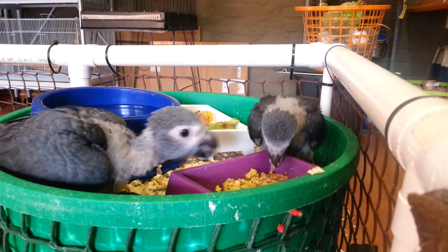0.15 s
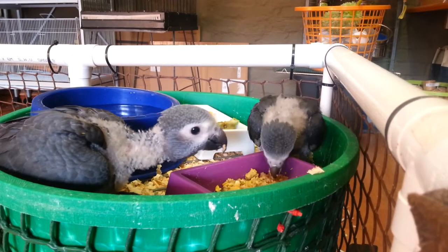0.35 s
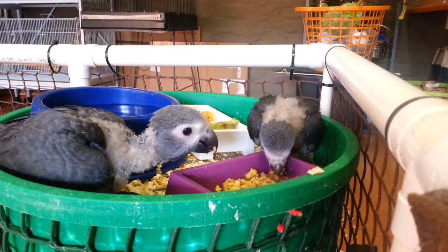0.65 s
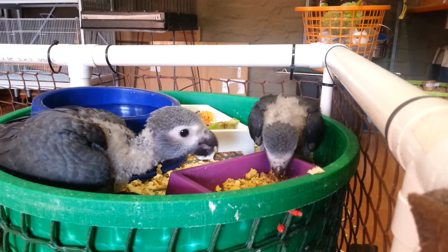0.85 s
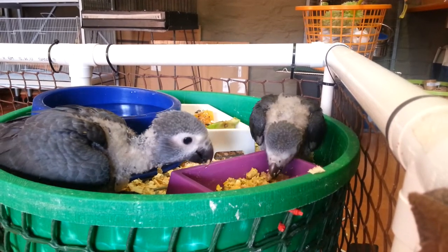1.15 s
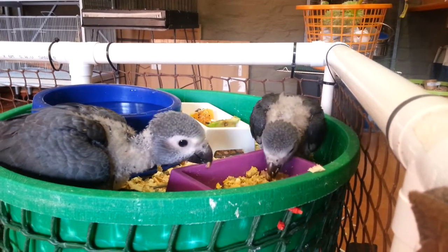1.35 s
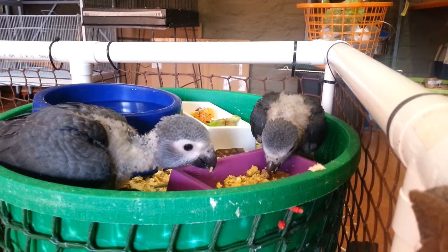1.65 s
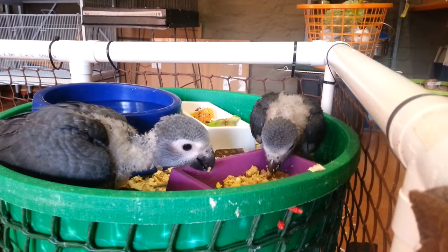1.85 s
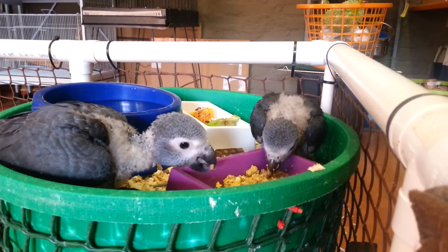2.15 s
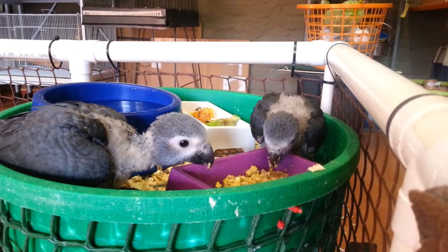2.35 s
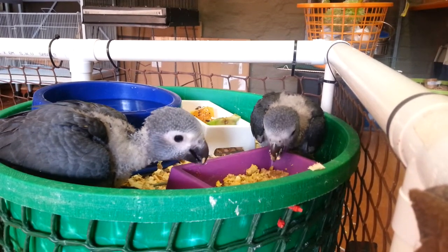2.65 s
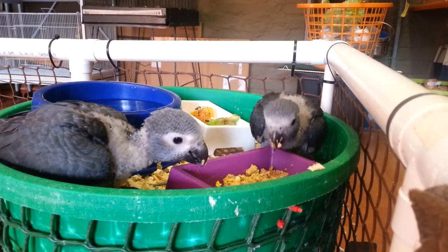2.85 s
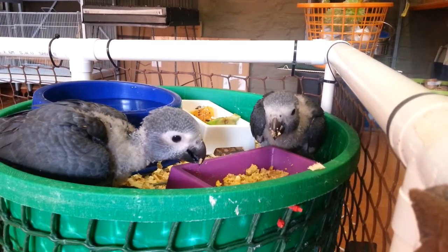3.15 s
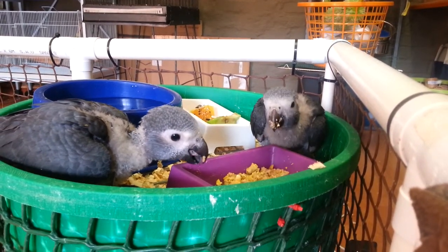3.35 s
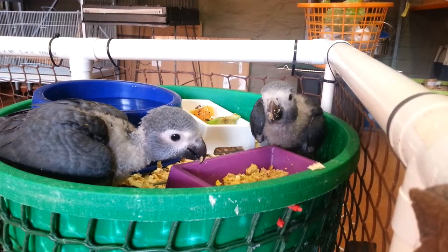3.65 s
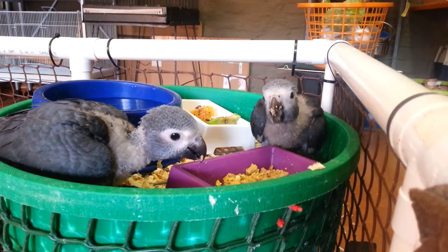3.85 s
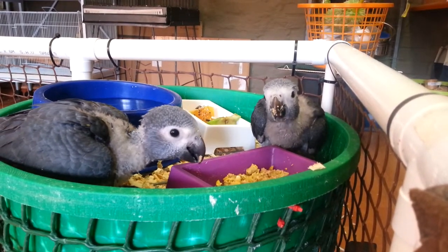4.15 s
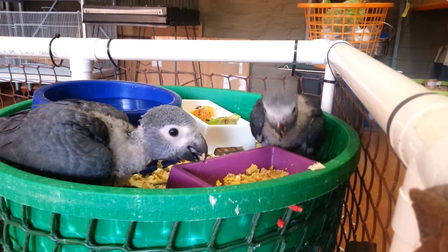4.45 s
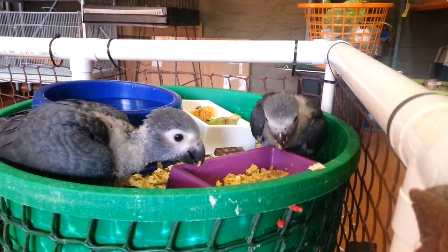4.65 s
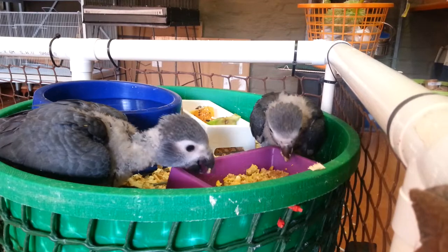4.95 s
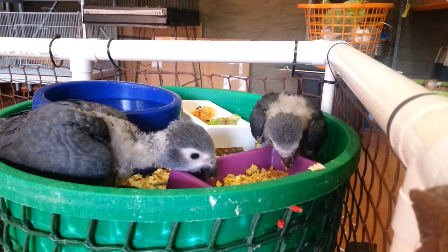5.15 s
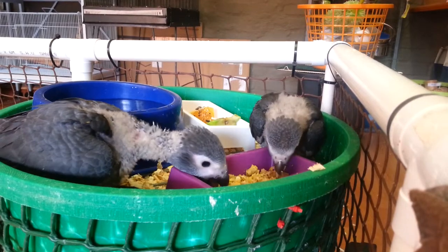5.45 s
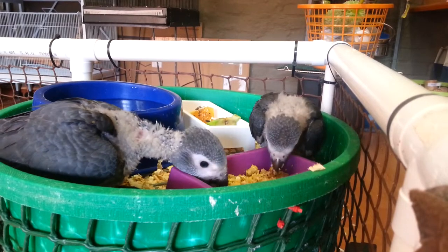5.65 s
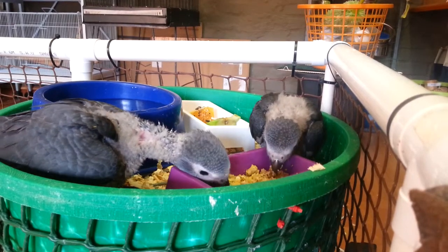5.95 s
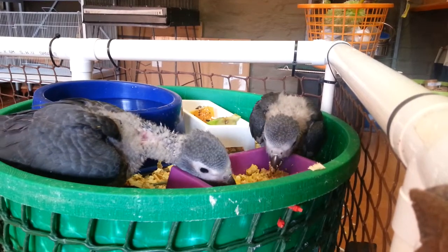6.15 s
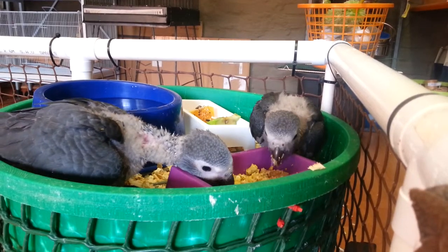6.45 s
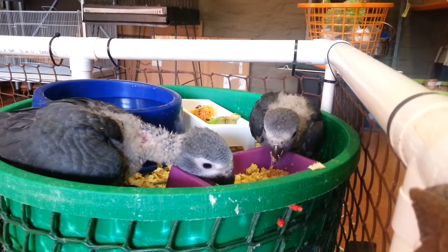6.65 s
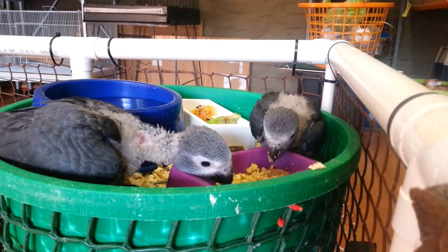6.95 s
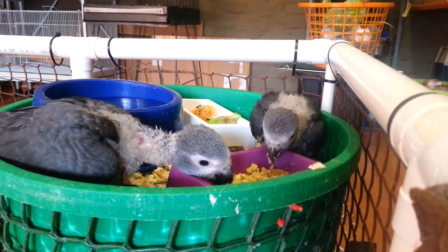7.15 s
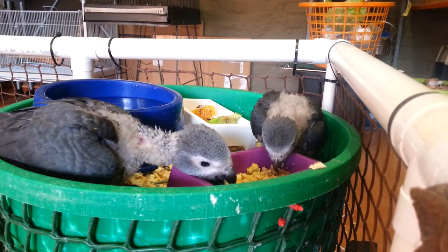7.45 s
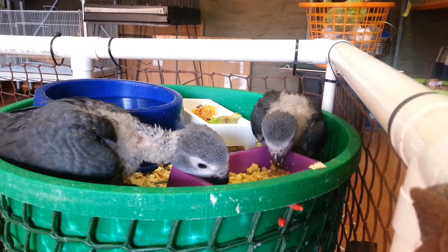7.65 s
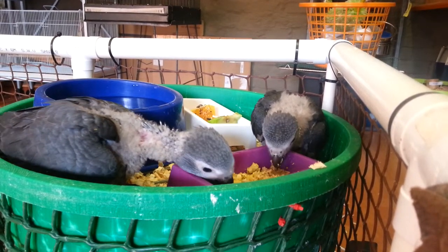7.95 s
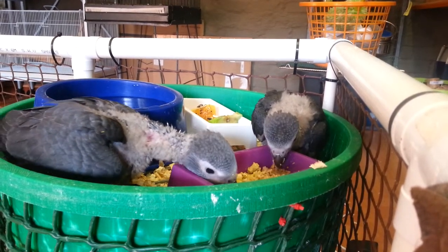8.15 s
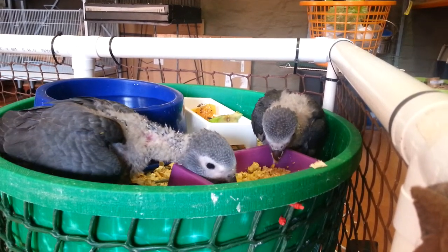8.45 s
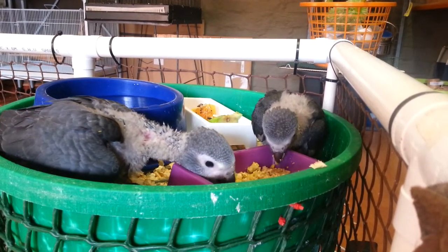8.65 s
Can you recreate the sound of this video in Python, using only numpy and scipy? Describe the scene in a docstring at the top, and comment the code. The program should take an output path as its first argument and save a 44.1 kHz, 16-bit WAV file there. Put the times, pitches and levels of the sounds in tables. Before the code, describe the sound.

Close, piercing chirps and quick chatter from feeding young parrots, with light beak clicks on plastic and other birds calling over a soft indoor hiss.

```python
"""Loud, arched chirps come first, from young parrots feeding in a hard-walled bird room.
The near birds also chatter and cluck, and tap a plastic dish with their beaks; others screech, honk,
croak, coo and whistle further off. Most calls are a buzzing tone shaped by the bird's throat.
Underneath are hiss, a fan's hum, a low murmur of air that swells and a brief rustle of feathers.
The walls echo the birds, and the small stereo microphone close to them overloads on loud notes."""
import sys
import numpy as np
from scipy import signal
from scipy.fft import rfft, irfft
from scipy.io import wavfile
from scipy.ndimage import uniform_filter1d

SR = 44100
rng = np.random.default_rng(int(sys.argv[2]) if len(sys.argv) > 2 else 0)


def file_out(sig):
    """Save sig as 16-bit WAV at sys.argv[1]."""
    # one column per channel
    cols = np.atleast_2d(sig).T
    # limit, then scale
    lim = np.clip(cols, -1, 1)
    pcm = np.round(lim * 32767).astype(np.int16)
    wavfile.write(sys.argv[1], SR, pcm)


N = 388521
TIME = np.arange(N) / SR

# Tone colour of the hiss and of the murmur of air (frequency [Hz], level [dB])
HISS_COLOUR = [(18, -43), (30, -24.5), (48, 5), (91, -3.5), (145, -50), (478, -30.5), (823, 6),
               (1790, -4.5), (3410, -1), (6190, -11.5), (14500, -10.5)]
MURMUR_COLOUR = [(24, -71.5), (40, -31.5), (227, -5), (514, -6.5), (567, -6.5), (897, -12), (1670, -32),
                 (2000, -22), (2600, -58.5), (4400, -120)]
# How the murmur and the feather rustle swell and fade (time [s], gain [dB])
MURMUR_SWELL = [(0, -76), (1.7, -52), (2.6, -63), (3.0, -44.5), (3.4, -40), (3.7, -46), (4.0, -56),
                (4.9, -52), (5.25, -41), (5.5, -54.5), (5.75, -55), (5.92, -47.5), (6.1, -57.5), (6.7, -54),
                (7.05, -45), (7.25, -56), (8.81, -53.5)]
RUSTLE_SWELL = [(3.45, -68), (3.62, -49.5), (3.85, -48.5), (4.0, -60), (4.1, -81)]
# Bands of the room's echo (frequency [Hz], time to fade by 60 dB [s], gain [dB])
ECHO_BANDS = [(513, 0.4, -3.5), (1500, 0.86, -5), (3860, 0.83, 0), (9600, 0.57, 10.5)]
# How the microphone's two sides differ (frequency [Hz], left minus right [dB])
SIDE_BALANCE = [(60, 4.5), (300, -3.5), (1000, 0.5), (2200, 6.5), (4300, 1.5), (8000, -16), (12000, -11.5)]

# Soft coos (time [s], length [s], start pitch [Hz], end pitch [Hz], level [dB])
COO_CALLS = [(2.65, 0.17, 222, 217, -44), (6.739, 0.09, 376, 355, -44.5), (6.947, 0.22, 338.5, 345.3, -49),
             (7.781, 0.21, 353.3, 346, -44.5)]
# Path of one falling whistle (time [s], pitch [Hz], level [dB])
WHISTLE_PATH = [(5.53, 3880, -67.5), (5.549, 3890, -53.5), (5.58, 3650, -45), (5.601, 3130, -50),
                (5.619, 2730, -67)]
# Nasal honks (time [s], length [s], start pitch [Hz], end pitch [Hz], gain [dB], rasp gain [dB])
HONK_CALLS = [(4.15, .13, 452.4, 444.5, -44, 6), (4.28, 0.083, 418, 412.2, -43.5, 6.5),
              (4.375, 0.097, 409.5, 409.2, -40.5, 8), (4.485, 0.15, 413.7, 451.4, -46, 2),
              (8.46, .085, 450, 439, -47, 8.5), (8.654, .155, 412, 430, -44.5, 0)]
# Croaks (time [s], length [s], pulse rate [Hz], level [dB])
CROAK_CALLS = [(0, 0.019, 154, -20.5), (1.186, 0.082, 119, -36), (6.104, 0.14, 106, -28)]
# Where the throats and the dish ring (frequency [Hz], width [Hz], gain [dB])
HONK_LOW_RINGS = [(460, 620, -1), (983, 200, 7.5)]
HONK_RASP_RINGS = [(1865, 500, 3.5), (2665, 1770, 4.5), (4340, 3000, -9.5)]
CROAK_RINGS = [(995, 680, -3), (2224, 630, -2.5), (3400, 500, -20.5), (4500, 530, -12.5)]
DISH_RINGS = [(760, 630, 5.5), (1210, 730, 7), (2080, 740, 8), (3330, 1500, -6)]
# Beak taps (time [s], peak level [dB], hardness as treble lift [dB per octave])
BEAK_TAPS = [(2.786, -22.5, 8), (3.087, -27, -10), (3.199, -39, -5), (3.377, -25.5, 11), (3.422, -27, -6),
             (3.629, -31.5, -5), (3.659, -35, -4), (3.817, -34, 11), (3.887, -24.5, 12), (5.027, -22, 2.5),
             (6.03, -34.5, -17), (7.013, -26.5, 2), (7.055, -22, -9), (7.852, -20, 4.5)]
# Low clucks (time [s], length [s], pitch [Hz], level [dB])
CLUCK_CALLS = [(0.716, .016, 620, -35), (0.733, .014, 600, -37.5), (1.661, .022, 760, -29.5),
               (1.686, .02, 770, -28.5), (1.72, .025, 730, -34.5)]
# Hoarse screeches (time [s], length [s], held pitch [Hz], start below it [share], level [dB],
# gain into the echo [dB], octave split [0-1], brightness [dB per octave])
SCREECH_CALLS = [(0.237, 0.072, 2082, .08, -20, 3, 0.12, 0), (1.101, 0.05, 2214, .04, -12, -9.5, 0.6, -1),
                 (1.669, 0.028, 1622, 0.037, -28.5, -1.5, 0, -4.5),
                 (2.379, 0.083, 2207, .11, -19.5, 3, 0, .5), (4.838, 0.1, 2214, .09, -22, -0.5, 0.43, 1),
                 (6.346, 0.082, 2167, 0.16, -18, 1.5, 0, 0.5),
                 (7.305, 0.076, 2001, 0.012, -19.5, 4, 0.17, 4.5),
                 (7.321, .063, 2505, .1, -13, 3, 0.08, -5.5), (7.453, 0.064, 2240, 0.015, -25, 6, 1, -2),
                 (8.093, 0.12, 2375, .17, -12, -2, .03, -1)]
# Tiny chirps of the chatter, in bursts of two or three (time [s], level [dB], length [ms])
CHATTER_CALLS = [(0.317, -18, 3.8), (.329, -24, 7.4), (.341, -19, 5.6), (.377, -12, 8.1),
                 (0.393, -11.5, 4.9), (.408, -18.5, 3.3), (.463, -14, 5.2), (0.474, -5, 4.6),
                 (0.489, -11, 8.5), (0.503, -21, 4.9), (.544, -13, 6.4), (.558, -10, 8.8),
                 (0.574, -20, 4.4), (0.614, -12.5, 6.9), (.628, -12.5, 8.2), (.673, -10, 3.7),
                 (.686, -8.5, 5.7), (0.701, -13.5, 4.6), (.743, -10.5, 6.5), (0.757, -11, 8.4),
                 (.773, -17, 6.4), (0.803, -14, 2.6), (0.814, -11.5, 12), (0.832, -14, 6.3),
                 (1.062, -11, 16), (1.182, -9.5, 14.2), (1.197, -8, 13.4), (1.247, -15, 3.3),
                 (1.263, -7, 15), (1.317, -11, 6.1), (1.327, -9.5, 14.8), (1.34, -11.5, 10.7),
                 (1.393, -13, 4.6), (1.404, -7, 11.2), (1.455, -18.5, 3.1), (1.465, -14, 22),
                 (1.526, -10, 23.7), (1.59, -13.5, 5.2), (1.603, -8, 11.4), (8.388, -9.5, 8.8)]
# Arched chirps (time [s], length [s], top pitch [Hz], level [dB], top reached at [share of length],
# start below top [share], end below top [share], octave split at [share of length, 1 = never],
# step down at the split [share of top pitch])
CHIRP_CALLS = [(0.014, .056, 2232, -2, .35, 0.26, .42, 0.22, .01),
               (0.091, 0.037, 1508, -14, 0.29, 0.096, 0.24, 0.79, 0),
               (0.167, 0.056, 2274, -3, .52, 0.32, 0.6, 1, 0),
               (0.834, 0.071, 1621, -13, .25, 0.25, 0.39, 0.92, 0),
               (0.939, 0.054, 2276, -5, .4, .36, 0.46, 0.84, 0),
               (1.006, 0.07, 1689, -15.5, 0.46, .22, 0.57, 0.86, 0),
               (2.097, 0.056, 2244, -3.5, .33, 0.29, .52, 1, 0),
               (2.172, 0.037, 1493, -11, 0.57, .12, 0.89, 1, 0),
               (2.24, 0.059, 2217, -4.5, .48, 0.34, 0.41, 1, 0),
               (2.326, 0.063, 1892, -12.5, .42, .29, .47, 1, 0),
               (2.842, 0.069, 2382, -2.5, 0.39, 0.31, 0.51, .42, .02),
               (4.016, 0.053, 2079, -3.5, .32, 0.22, 0.47, 0.93, 0),
               (4.187, 0.025, 1297, -15.5, 0.21, 0.027, 0.12, 0.79, 0),
               (4.606, 0.028, 2054, -10, .3, 0.0076, 0.12, 1, 0),
               (4.648, 0.068, 2313, -3, .45, 0.32, .46, 0.28, 0),
               (4.72, 0.02, 1395, -18.5, .3, .01, .22, 0.9, 0),
               (4.788, 0.061, 2190, -4, 0.33, 0.45, 0.29, .33, .06),
               (6.244, .062, 2184, -3, 0.37, .26, 0.36, .37, .02),
               (6.308, 0.051, 1326, -18, .6, 0.06, 0.27, 1, 0),
               (6.426, .062, 2255, -4.5, .45, .36, 0.65, 1, 0),
               (6.489, 0.042, 1484, -14.5, 0.5, .02, 0.32, 1, 0),
               (7.391, 0.066, 2287, -6, .36, 0.28, 0.45, .34, .01),
               (7.535, 0.062, 2290, -8, .3, 0.44, .48, .38, .07),
               (7.673, 0.036, 2057, -15.5, 0.23, 0.0081, 0.12, 0.52, 0),
               (8.244, 0.06, 2337, -4.5, .45, 0.36, .4, .25, 0),
               (8.321, 0.033, 1560, -23, .4, 0.025, 0.056, 0.72, 0),
               (8.394, 0.057, 2054, -3, .42, .42, 0.386, 0.19, 0),
               (8.545, 0.061, 2177, -2, .45, .35, .4, .2, 0),
               (8.694, 0.02, 1907, -15, 0.27, 0.047, 0.17, 1, 0)]
# How the throat shapes each call, and the tones a split adds (frequency [Hz], gain [dB])
SCREECH_COLOUR = [(2200, -10.5), (4400, -1), (6500, -2), (8700, -20), (11000, -18), (13200, -18),
                  (15500, -37)]
CHATTER_COLOUR = [(900, -12.5), (1600, -0.5), (2400, -17.5), (3200, 3.5), (4300, -2), (5300, -8.5),
                  (6500, -20), (9000, -38), (13000, -47.5)]
CHIRP_COLOUR = [(900, -11.5), (1500, -6), (2200, -13), (3000, -4), (3700, 1), (4400, 4), (5000, -4),
                (5800, -15.5), (9000, -24.5), (13000, -29.5)]
SPLIT_COLOUR = [(1100, -23.5), (3200, -2), (5300, -3.5), (7500, -31), (13000, -30.5)]


def undb(db):
    """Turn decibels into a number to multiply by."""
    return 10 ** (np.asarray(db) / 20)


def level(x, db):
    """Scale a sound to an average (RMS) level."""
    return x * undb(db) / np.sqrt(np.mean(x ** 2))


def look_up(table, hz):
    """Read a (frequency, value) table on a log frequency axis."""
    table_hz, values = np.transpose(table)
    return np.interp(np.log(np.maximum(hz, 1)), np.log(table_hz), values)


def noise(colour):
    """Noise with the given tone colour, at 0 dB."""
    gain = undb(look_up(colour, np.fft.rfftfreq(N, 1 / SR)))
    return level(irfft(rfft(rng.standard_normal(N)) * gain, N), 0)


def wobble(size, rate):
    """A smooth random wiggle of spread 1 that turns about `rate` times a second."""
    k = max(int(SR / rate), 1)
    smooth = uniform_filter1d(uniform_filter1d(rng.standard_normal(size + 4 * k), k), k)
    return smooth[2 * k:2 * k + size] * np.sqrt(1.5 * k)


def ring(x, bands, order=1):
    """Let a sound ring in bands (frequency [Hz], width [Hz], gain [dB]); order 2 is steeper."""
    return sum(undb(db) * signal.sosfilt([np.hstack(signal.iirpeak(hz, hz / width, SR))] * order, x)
               for hz, width, db in bands)


def add(out, start, x):
    """Mix x into out from `start` seconds on."""
    i = max(int(start * SR), 0)
    out[i:i + len(x)] += x[:N - i]


def pulses(hz, jitter, scatter_db, top_hz):
    """One soft push of air per cycle, uneven in time and size."""
    cycles = np.cumsum(hz * (1 + jitter * wobble(len(hz), 200))) / SR
    clicks = np.diff(np.floor(cycles), prepend=0) * undb(scatter_db * rng.standard_normal(len(hz)))
    return signal.sosfilt(signal.butter(4, top_hz, fs=SR, output="sos"), clicks)


def parrot_voice(hz, throat, split, hoarse):
    """A tone with overtones. In a split every second vibration weakens, adding the octave below."""
    k = np.arange(1, 21)[:, None]
    tone_hz = k * hz / 2  # odd k sounds only in a split
    split_gain = split * undb(look_up(SPLIT_COLOUR, tone_hz))
    normal_gain = (1 - .26 * split) * undb(look_up(throat, tone_hz))
    gain = np.where(k % 2, split_gain, normal_gain) * (tone_hz < .45 * SR)
    # Hoarseness shakes each overtone on its own, the high ones most.
    shake = hoarse * (k * hz / 1e4) ** 2 * np.array([wobble(len(hz), 1200) for _ in k])
    phase = k * np.pi * np.cumsum(hz) / SR + k ** 2 * .27
    return np.sum(gain * np.sin(phase + shake), axis=0)


def background():
    """Steady hiss, a swelling murmur of air mostly shared by both sides, feathers and a fan's hum."""
    hiss = np.array([noise(HISS_COLOUR), noise(HISS_COLOUR)]) * undb(-48)
    murmur = noise(MURMUR_COLOUR) + .5 * np.array([noise(MURMUR_COLOUR), noise(MURMUR_COLOUR)])
    murmur *= undb(np.interp(TIME, *np.transpose(MURMUR_SWELL)) + 1.9 * wobble(N, 8.5))
    rustle = ring(rng.standard_normal((2, N)), [(3670, 1700, 20.2)], order=2)
    rustle *= undb(np.interp(TIME, *np.transpose(RUSTLE_SWELL)) + 1.5 * wobble(N, 36))
    hum = undb(-62.5 + 1.5 * wobble(N, 7)) * np.sin(2 * np.pi * 100 * TIME)
    return hiss + murmur + rustle + hum


def room_echo(x):
    """Hard walls give a dense echo, different on each side; each band fades at its own pace."""
    t = np.arange(int(.9 * SR)) / SR
    tail = sum(ring(rng.standard_normal((2, len(t))), [(hz, hz, db)]) / np.sqrt(hz) * 1000. ** (-t / fade)
               for hz, fade, db in ECHO_BANDS)
    tail *= np.clip((t - .004) / .0026, 0, 1)  # the first echo takes 4 ms
    tail /= np.sqrt(np.sum(tail ** 2) / 2)
    return signal.fftconvolve(x[None], tail, axes=1)[:, :N]


def coos():
    """Soft, wavering tones far off, with two weak overtones."""
    out = np.zeros(N)
    for start, length, start_hz, end_hz, db in COO_CALLS:
        u = np.linspace(0, 1, int(length * SR))  # u runs from 0 to 1 through a call
        hz = (start_hz + (end_hz - start_hz) * u) * (1 + .02 * wobble(len(u), 50))
        phase = 2 * np.pi * np.cumsum(hz) / SR
        voice = np.sin(phase) + .26 * np.sin(2 * phase) + .31 * np.sin(3 * phase)
        voice *= undb(5.9 * wobble(len(u), 58))
        add(out, start, level(voice * np.sin(np.pi * u) ** .6, db))
    return out


def whistle():
    """One faint, pure tone that slides down."""
    out = np.zeros(N)
    times, hz, db = np.transpose(WHISTLE_PATH)
    t = np.arange(times[0], times[-1], 1 / SR)
    phase = 2 * np.pi * np.cumsum(np.interp(t, times, hz)) / SR
    add(out, times[0], undb(np.interp(t, times, db)) * np.sin(phase))
    return out


def honks():
    """Fast pulses ring a throat: a low nasal tone with a flickering rasp on top."""
    out = np.zeros(N)
    for start, length, start_hz, end_hz, db, rasp_db in HONK_CALLS:
        t = np.arange(0, length, 1 / SR)
        hz = start_hz + (end_hz - start_hz) * t / length
        push = level(pulses(hz, jitter=.02, scatter_db=2.5, top_hz=5000), 15)
        tone = ring(push, HONK_LOW_RINGS, order=2)
        rasp = ring(push, HONK_RASP_RINGS, order=2) * undb(rasp_db + 1.94 * wobble(len(t), 27))
        fade = np.clip(np.minimum(t, length - t) / .0082, 0, 1)
        add(out, start, (tone + rasp) * undb(db) * fade)
    return out


def croaks():
    """Slow, uneven pulses ring a throat."""
    out = np.zeros(N)
    for start, length, rate, db in CROAK_CALLS:
        u = np.linspace(0, 1, int(length * SR))
        push = pulses(np.full(len(u), rate), jitter=.15, scatter_db=2, top_hz=4500)
        swell = np.sin(np.pi * u ** 1.83) ** .39
        add(out, start, level(ring(push, CROAK_RINGS, order=2) * swell, db))
    return out


def screeches():
    """Quick wavers of pitch and strength smear the voice. Returns the direct sound and the echo's feed."""
    direct, to_room = np.zeros(N), np.zeros(N)
    for start, length, held_hz, rise, db, echo_db, split, bright_db in SCREECH_CALLS:
        u = np.linspace(0, 1, int(length * SR))
        dip = np.interp(u, [0, .45, 1], [rise, 0, .017])  # climb, then sag a little
        hz = held_hz * (1 - dip + .022 * wobble(len(u), 300))
        throat = [(f, gain + bright_db * np.log2(f / 4400)) for f, gain in SCREECH_COLOUR]
        voice = parrot_voice(hz, throat, split, hoarse=.15) * undb(3.5 * wobble(len(u), 400))
        voice = level(voice * np.clip(u * 8, 0, 1) * np.clip((1 - u) * 3, 0, 1), db)
        add(direct, start, voice)
        add(to_room, start, voice * undb(echo_db))
    return direct, to_room


def beak_taps():
    """A beak briefly rings the plastic dish; a harder tap rings its higher notes more."""
    out, t = np.zeros(N), np.arange(900) / SR
    for start, db, hardness in BEAK_TAPS:
        bands = [(hz, width, gain + hardness * np.log2(hz / 1000)) for hz, width, gain in DISH_RINGS]
        knock = rng.standard_normal(len(t)) * np.exp(-t / .005) * np.clip(t / .002, 0, 1)
        tap = ring(knock, bands, order=2)
        add(out, start, tap * undb(db) / np.abs(tap).max())
    return out


def clucks():
    """A short wavering tone from a closed beak, with a rough rasp above it."""
    out = np.zeros(N)
    for start, length, hz, db in CLUCK_CALLS:
        u = np.linspace(0, 1, int(length * SR))
        tone = np.sin(2 * np.pi * np.cumsum(hz * (1 + .09 * wobble(len(u), 150))) / SR)
        breath = rng.standard_normal(len(u))
        rasp = ring(breath, [(1615, 500, 6), (3230, 500, 12), (4700, 1000, 6.5)], order=2)
        add(out, start, level((tone + rasp * (1 + tone)) * np.sin(np.pi * u), db))
    return out


def chatter():
    """Each tiny chirp is a quick arch of pitch with a rasp of air; longer, louder ones climb higher."""
    out = np.zeros(N)
    for (start, db, ms), chance in zip(CHATTER_CALLS, rng.standard_normal(len(CHATTER_CALLS))):
        u = np.linspace(0, 1, int(ms * SR / 1000))
        top_hz = (4665 + 39.56 * ms + 23 * db) / 2 * (1 + .05 * chance)
        dip = .295 + .01018 * ms
        top_at = np.clip(5.5 / ms, .5, 1)  # under 5.5 ms, it ends before turning down
        hz = top_hz * (1 - dip * (u / top_at - 1) ** 2 + .035 * wobble(len(u), 600))
        voice = parrot_voice(hz, CHATTER_COLOUR, split=.2, hoarse=.8) * (1 + .35 * wobble(len(u), 500))
        rasp = ring(rng.standard_normal(len(u)), [(1500, 790, -13.5), (4950, 1500, -8.5)])
        swell = np.clip(u * 4, 0, 1) * np.clip((1 - u) * 3, 0, 1)
        add(out, start, level((level(voice, 0) + rasp) * swell, db))
    return out


def chirps():
    """The voice starts suddenly with a puff of air, climbs to a top and falls, trembling a little."""
    out = np.zeros(N)
    for start, length, top_hz, db, top_at, rise, fall, split_at, step in CHIRP_CALLS:
        u = np.linspace(0, 1, int(length * SR))
        split = np.clip((u - split_at) * 40, 0, 1)
        climb = rise * np.clip(1 - u / top_at, 0, 1) ** 2.3
        fall_bend = 4 if split_at < .8 else 2.2  # a split voice holds its pitch longer
        drop = fall * np.clip((u - top_at) / (1 - top_at), 0, 1) ** fall_bend
        hz = top_hz * (1 - climb - drop - step * split) * (1 + .004 * wobble(len(u), 700))
        voice = parrot_voice(hz, CHIRP_COLOUR, split, hoarse=.18)
        onset = np.clip(u * 150 * undb(1.6 * db), 0, 1)  # louder is more sudden
        swell = (.75 + .25 * np.clip(u * 4, 0, 1)) * np.clip((1 - u) * 2.62, 0, 1) ** .76
        tremble = 1 + .029 * wobble(len(u), 1500)
        puff = ring(rng.standard_normal(len(u)), [(4060, 7900, db - 12.5)], order=2) * np.exp(-u / .23)
        add(out, start, level(voice * onset * swell * tremble, db) + puff)
    return out


def microphone_sides(x, left_lag_samples=11):
    """Sound reaches the microphone's right side first, and each side colours it its own way."""
    tilt_db = look_up(SIDE_BALANCE, np.fft.rfftfreq(N, 1 / SR)) / 2
    return irfft(rfft([np.roll(x, left_lag_samples), x]) * undb([tilt_db, -tilt_db]), N)


def scene():
    """Mix birds, echo and background; the near birds get less echo than the far ones."""
    screech, screech_to_room = screeches()
    near = chirps() + chatter() + clucks() + beak_taps()
    far = honks() + croaks() + coos() + whistle()
    echo = room_echo(undb(-9) * near + screech_to_room + far)
    return microphone_sides(near + screech + far) + echo + background()


def record(dry):
    """A lopsided amplifier puts a low thump under loud notes; peaks clip; the highest treble is cut."""
    lopsided = np.array([[.004], [.02]])  # left, right
    clipped = np.clip(dry + lopsided * dry ** 2, -1, 1)
    return signal.sosfilt(signal.ellip(6, .3, 30, 14700, fs=SR, output="sos"), clipped)


dry = scene()
out = record(dry)
file_out(out)
```